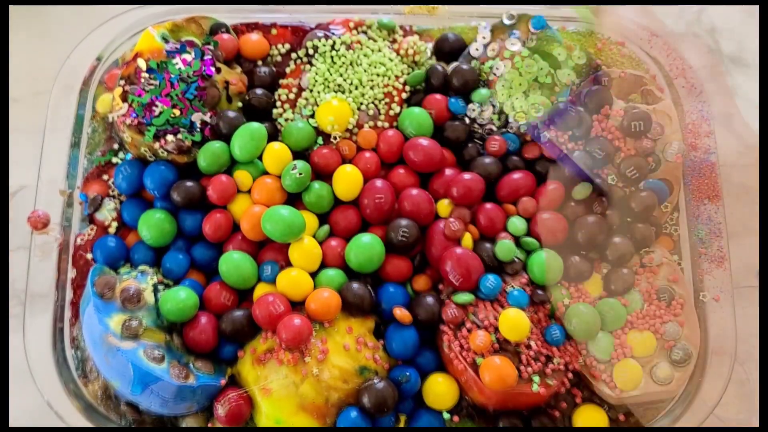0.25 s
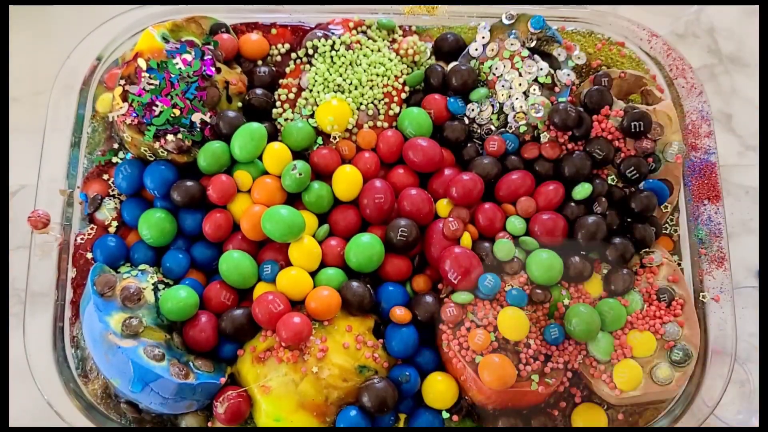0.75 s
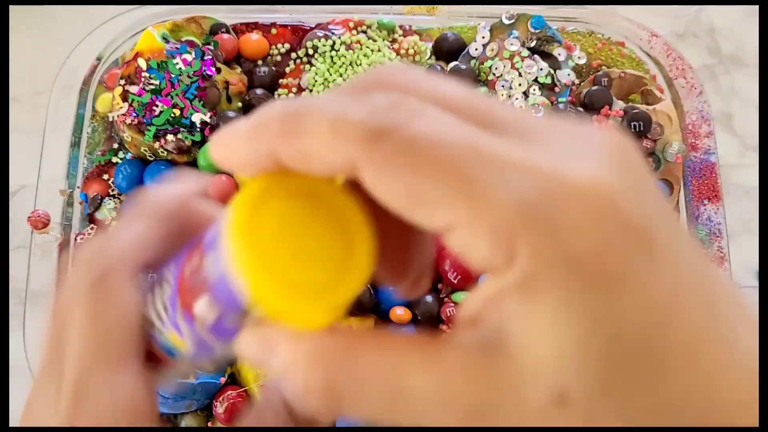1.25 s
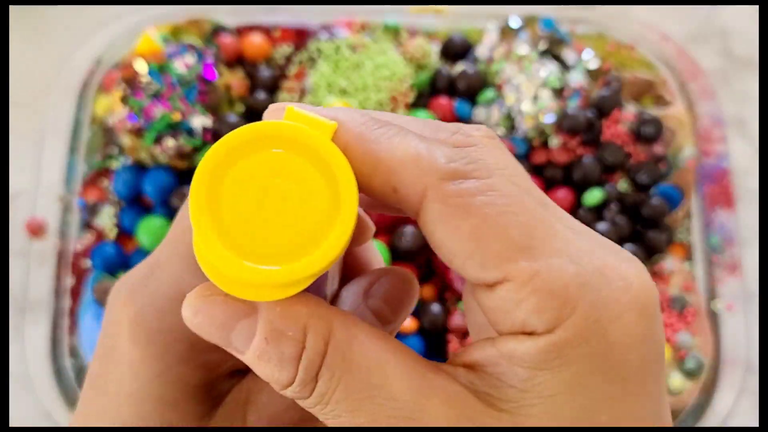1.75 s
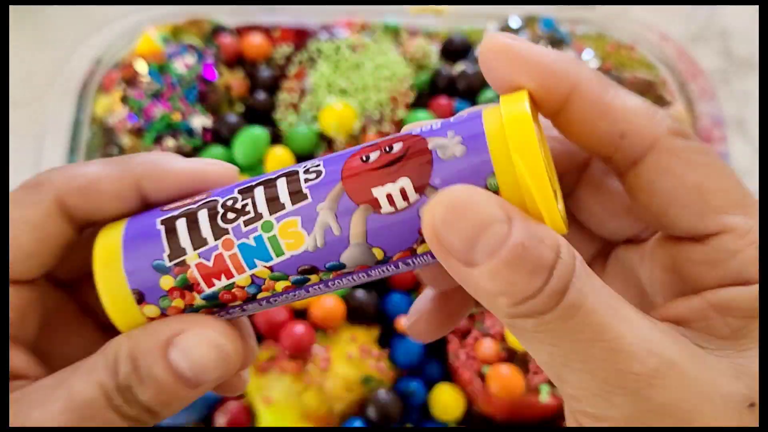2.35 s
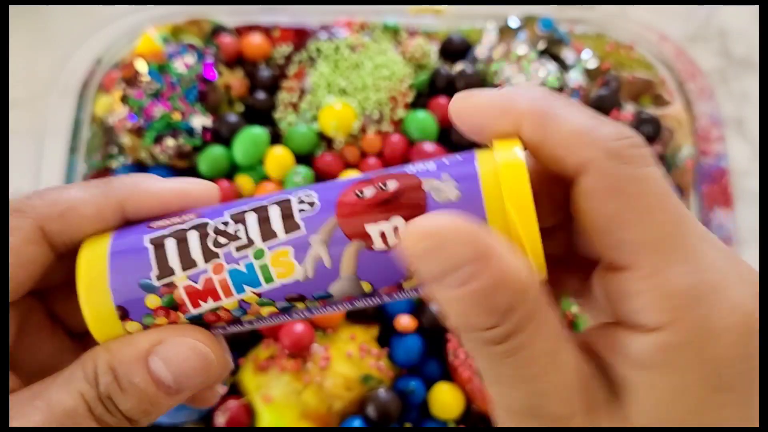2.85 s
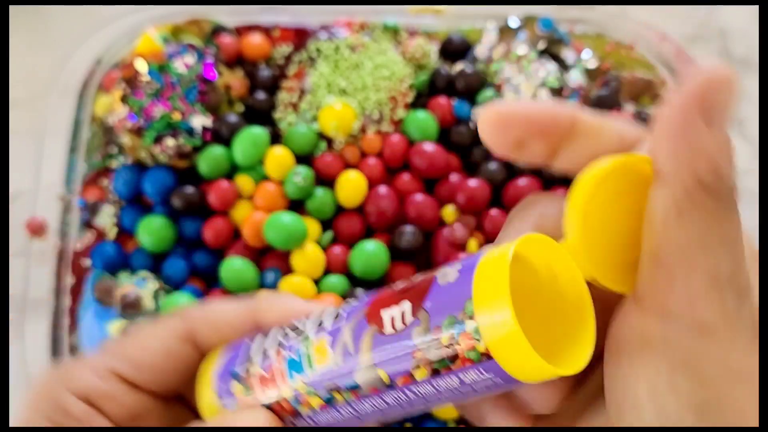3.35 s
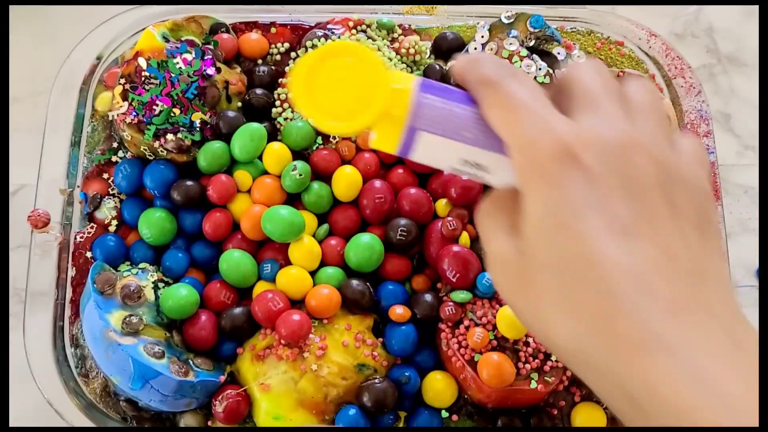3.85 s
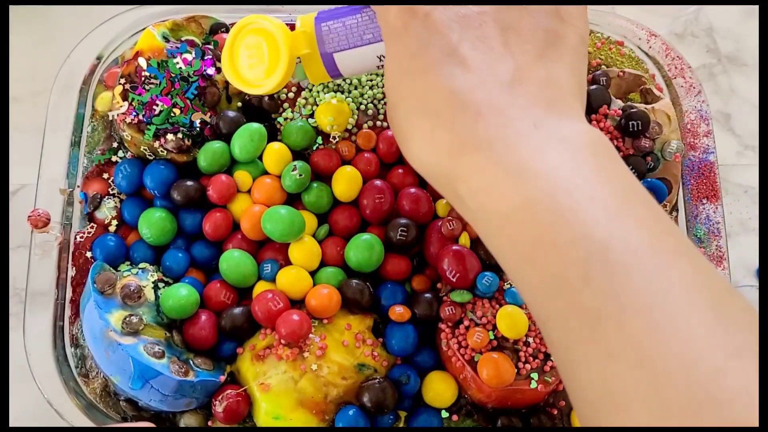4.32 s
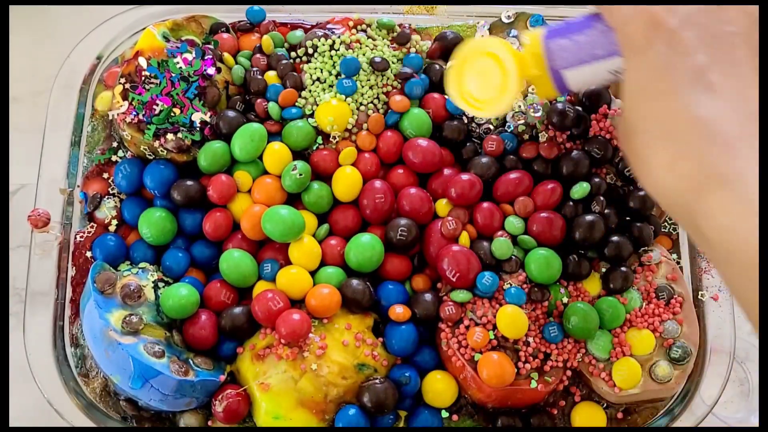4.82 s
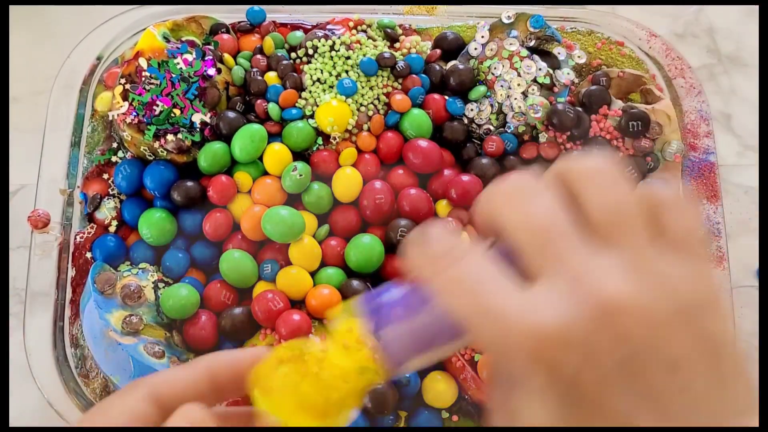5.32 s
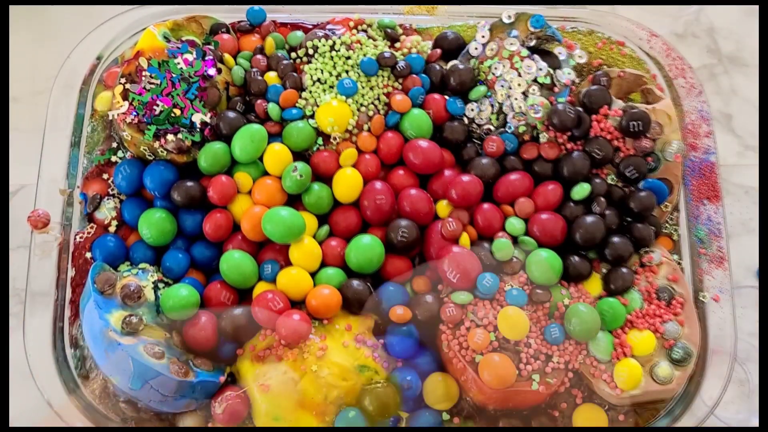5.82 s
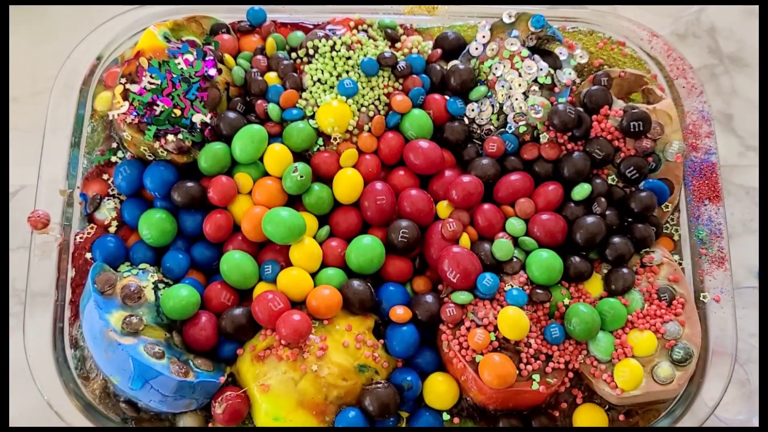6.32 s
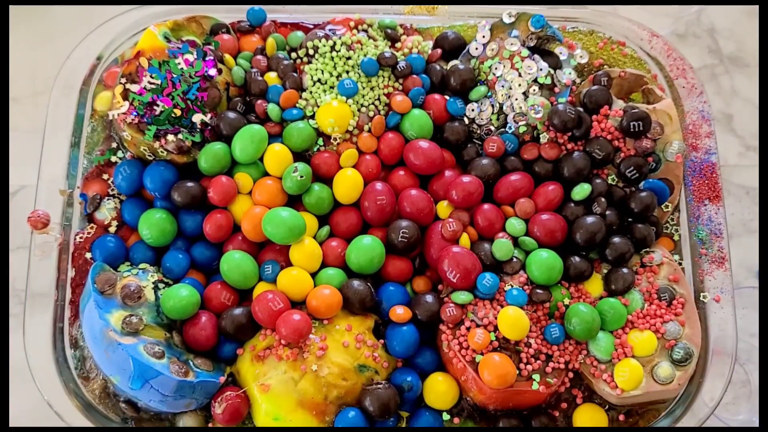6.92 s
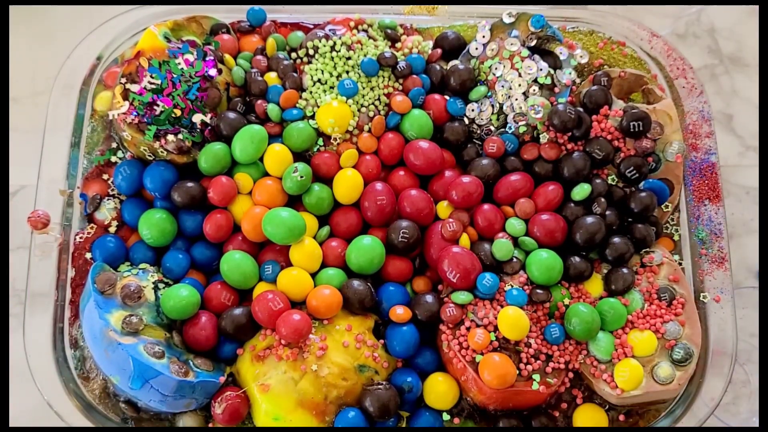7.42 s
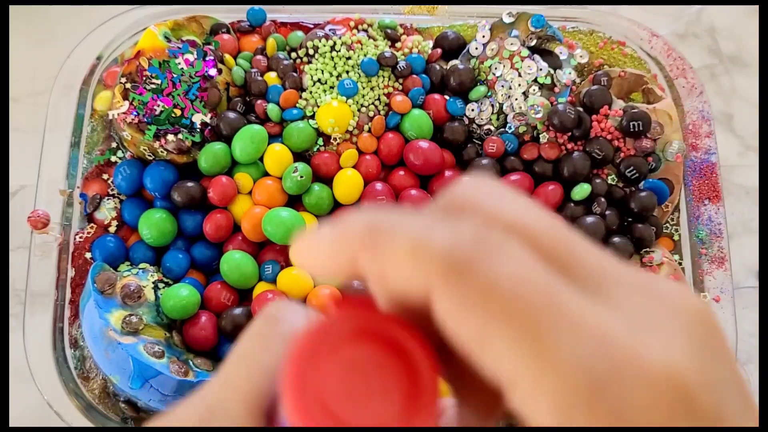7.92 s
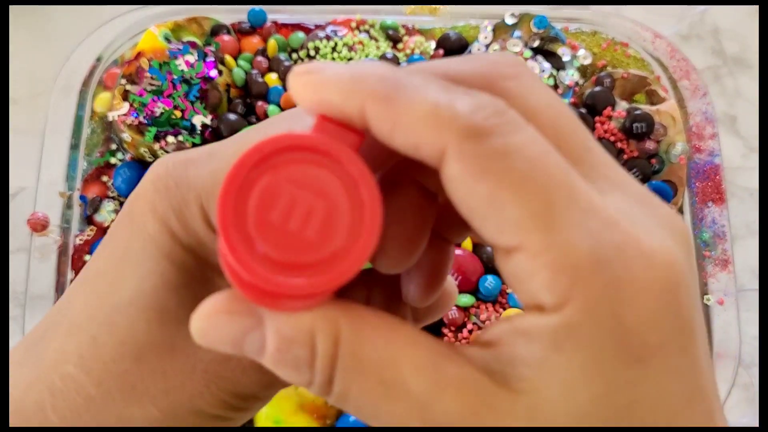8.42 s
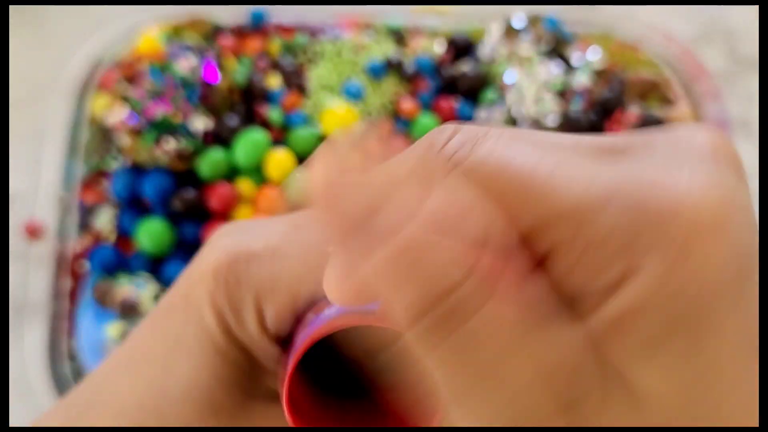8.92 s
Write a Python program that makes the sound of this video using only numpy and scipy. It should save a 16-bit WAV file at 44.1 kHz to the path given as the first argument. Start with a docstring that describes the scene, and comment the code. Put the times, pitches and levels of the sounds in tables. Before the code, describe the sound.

Things are bumped and set down nearby, then a candy tube clicks, rattles softly and pops open with a hollow ring. A sliding rattle swells into a dense, crisp shower of tiny hard candies, with a hollow airy hum sinking in pitch as the tube empties. A thump, a loud clack and woody knocks with faint glass chinks follow, then another lid pop, all close in a small reverberant room.

```python
"""Mini candies skid down a plastic tube and pour onto other candies in a glass dish, as many small collisions.
The air in the emptying tube hums, and its pitch sinks. Before the pour, the tube is picked up, its seal torn
and its lid popped: filtered clicks with ringing modes. Afterwards things are knocked and set down nearby,
then a second tube is shaken and popped open. It is heard close up in a small hard room, over a low hum."""
import sys
import numpy as np
from scipy import signal
from scipy.fft import rfft, irfft, next_fast_len
from scipy.io import wavfile
from scipy.ndimage import uniform_filter1d

SR = 44100
rng = np.random.default_rng(int(sys.argv[2]) if len(sys.argv) > 2 else 0)


def put_to_file(sound):
    """Save the sound as 16-bit audio at rate SR, in the file named by the first command-line argument."""
    columns = np.atleast_2d(sound).T  # one column per channel
    safe = np.clip(columns, -1, 1)
    whole_steps = np.round(safe * 32767)
    wavfile.write(sys.argv[1], SR, whole_steps.astype(np.int16))


N = 403956
TIME = np.arange(N) / SR  # seconds
TOP_HZ = 16000  # upper limit of the sound
LN_60_DB = np.log(1000)  # a fall of 60 dB


def undb(db):
    """Turn decibels into gain."""
    return 10 ** (np.asarray(db) / 20)


def unit(x):
    """Scale to rms 1."""
    return x / np.sqrt(np.mean(x ** 2) + 1e-20)


def at(points, hz):
    """Read a table of (Hz, value) points, with straight lines over log frequency."""
    f, value = np.transpose(points)
    return np.interp(np.log(hz + 1), np.log(f), value)


def body(points, tilt=0, size=2048):
    """Response of a struck thing: it has the given colour and unit energy, and starts at once."""
    hz = np.fft.rfftfreq(size, 1 / SR)
    db = at(points, hz) + tilt * np.log2(np.maximum(hz, 300))
    # folding the cepstrum forward in time gives the minimum-phase response
    cepstrum = irfft(np.log(undb(db)))
    cepstrum[1:size // 2] *= 2
    cepstrum[size // 2 + 1:] = 0
    h = irfft(np.exp(rfft(cepstrum)))
    return h / np.linalg.norm(h)


def through(x, h):
    """Pass a sound through a response."""
    return signal.oaconvolve(np.atleast_2d(x), np.atleast_2d(h), axes=1)[:, :np.shape(x)[-1]]


def add(out, s, x):
    """Mix a short sound in at s seconds."""
    i = max(int(s * SR), 0)
    out[:, i:i + x.shape[-1]] += x[..., :N - i]


def mode(hz, t60):
    """One ringing mode: a sine that decays from 1 by 60 dB in t60 seconds."""
    t = np.arange(SR // 2) / SR
    return np.sin(2 * np.pi * hz * t) * np.exp(-LN_60_DB * t / t60)


def swell(s, hold_s, db, rise_s, fade_s):
    """Gain that rises by 60 dB to its level at s seconds, holds, and fades by 60 dB; silent outside."""
    start, end = np.clip(np.array([s - rise_s, s + hold_s + fade_s]) * SR, 0, N).astype(int)
    t = np.arange(start, end) / SR
    before = np.maximum(s - t, 0) / rise_s
    after = np.maximum(t - s - hold_s, 0) / fade_s
    gain = np.zeros(N)
    gain[start:end] = undb(db) * np.exp(-LN_60_DB * (before + after))
    return gain


def gestures(rows, rise_s, fade_s):
    """Add up one swell for each row of start, length and level."""
    return sum(swell(s, length, db, rise_s, fade_s) for s, length, db in rows)


def stereo_noise(size, wide_hz):
    """Spectrum of noise that is alike on both sides in the bass and unrelated in the treble."""
    mid, side = rfft(rng.standard_normal((2, size)))
    hz = np.fft.rfftfreq(size, 1 / SR)
    width = hz / np.hypot(hz, wide_hz)
    return (mid + np.array([[1], [-1]]) * width * side) / np.sqrt(1 + width ** 2), hz


def contact(scatter_db, scatter_s, lead=0, size=2048):
    """A click, earlier on the left by lead samples, and its noisy scatter off hands and dish."""
    t = np.arange(size) / SR
    noise = irfft(stereo_noise(size, wide_hz=1800)[0])
    x = noise * np.exp(-t / scatter_s) * (1 - np.exp(-t / .0003))
    x *= undb(scatter_db) / np.linalg.norm(x, axis=1, keepdims=True)
    x[0, max(-lead, 0)] += 1
    x[1, max(lead, 0)] += 1
    return x / np.sqrt(1 + undb(scatter_db) ** 2)


def blows(rows, colour, scatter_db, scatter_s, lead=0, pan_db=0, modes=()):
    """Each contact sounds the body and rings its modes, which vary a little in pitch and strength."""
    out = np.zeros((2, N))
    sides_db = np.array([[pan_db], [-pan_db]]) / 2
    for s, db, tilt in rows:
        strength = np.sqrt(.005 * SR) * undb(db + sides_db)  # levels count the energy over 5 ms
        hit = through(contact(scatter_db, scatter_s, lead), body(colour, tilt))
        add(out, s, strength * hit / np.linalg.norm(hit, axis=1, keepdims=True))
        for hz, share_db, t60 in modes:
            ring = mode(hz * (1 + .025 * rng.standard_normal()), t60)
            struck_db = 3 * rng.standard_normal()
            add(out, s, strength * undb(share_db + struck_db) * ring / np.linalg.norm(ring))
    return out


def collision_kinds(colour, scatter_db, scatter_s, ring_hz, count, size):
    """A set of tiny clicks, each from its own place and with its own brief ring."""
    ring_db, ring_s, ring_octaves = -5, .004, .6  # level against the click, t60, spread of pitch
    shape, grains = body(colour), []
    for pitch, lead in zip(rng.standard_normal(count), rng.integers(-5, 10, count)):
        click = contact(scatter_db, scatter_s, lead, size=size)
        hz = min(ring_hz * 2 ** (ring_octaves * pitch), TOP_HZ)
        ring = through(click, mode(hz, ring_s)[:size])
        grains.append(through(unit(click) + undb(ring_db) * unit(ring), shape))
    return unit(np.array(grains))


def rattle(gain, colour, rate, spread_db, scatter_db, scatter_s, ring_hz, count=40, size=1024):
    """Many small collisions of uneven strength, rate of them a second, follow the gain."""
    grains = collision_kinds(colour, scatter_db, scatter_s, ring_hz, count, size)
    hits = int(rate * N / SR)
    starts = ((np.arange(hits) + 2 * rng.random(hits)) * SR / rate).astype(int) % N
    strengths_db = spread_db * np.minimum(rng.standard_normal(hits), 2)
    strengths = unit(rng.choice([-1, 1], hits) * undb(strengths_db))
    kinds = rng.integers(count, size=hits)
    out = np.zeros((2, N))
    for i, strength, kind in zip(starts, strengths, kinds):
        if gain[i] > 0:
            add(out, i / SR, gain[i] * strength * grains[kind])
    return out / np.sqrt(rate * size / SR)


def stream_flow():
    """Flow of candies into the dish: it builds, thins slowly and stops when the tube is empty."""
    start_s, sag_db_per_s = 4.535, 3.5
    since = np.maximum(TIME - start_s, 0)
    return swell(start_s, .37, db=-35.5, rise_s=.74, fade_s=.13) * undb(-sag_db_per_s * since)


# Colour of candy landing on candy. Each row: frequency in Hz, level in dB.
CANDY_COLOUR = [(150, -56), (370, -3), (600, -13), (1200, -6), (3500, -1.5), (5500, -2.5), (11000, 5),
                (16000, 1)]


def stream(flow):
    """The candies land on others as a dense patter of tiny bright collisions."""
    return rattle(flow, CANDY_COLOUR, rate=950, spread_db=5.5, scatter_db=2, scatter_s=.0009, ring_hz=7000)


# Single candies landing hard.
# Each row: start in seconds, level in dB, brightness in dB per octave above 300 Hz.
DROPS = [(4.33, -44, -1), (4.397, -31, 2.5), (4.4315, -29, 1.5), (4.4435, -29, -1), (4.565, -27.5, 3),
         (4.584, -31, 2), (4.599, -28, 1), (4.636, -30, -1), (4.658, -29, 1.5), (4.665, -33, 0.5),
         (4.685, -31, 3), (4.769, -35, 2), (4.905, -25.5, 1.5), (4.944, -33, 3), (4.958, -30, 2),
         (5.016, -37.5, 7)]


def drops():
    """Single candies stand out of the stream as sharp clicks."""
    return blows(DROPS, CANDY_COLOUR, scatter_db=6, scatter_s=.0009, lead=2)


def skid_gain():
    """How strongly the candies skid: a slow rise before they land, then a fade."""
    return swell(4.376, .25, db=-41, rise_s=1.48, fade_s=.7)


# Colour of candies skidding down the tube. Each row: frequency in Hz, level in dB.
SKID_COLOUR = [(600, -23), (1300, 1), (2000, 1.5), (3550, -5), (4000, 7.5), (4450, -4.5), (12000, -12.5)]


def skid(gain):
    """Candies sliding down the tilted tube knock on its wall many times a second."""
    return rattle(gain, SKID_COLOUR, rate=650, spread_db=6, scatter_db=2, scatter_s=.002, ring_hz=3500)


JOLT_RISE_S, JOLT_SETTLE_S = .05, .05  # over 60 dB
# Jolts that make the candies shift inside a tube. Each row: start in seconds, length in seconds, level in dB.
JOLTS = [(1.2, 0.27, -52), (1.38, 0.025, -41), (2.45, 0.037, -52), (2.908, .016, -52.5),
         (3.42, 0.058, -57.5), (3.495, 0.052, -50), (3.61, 0.0059, -51.5), (3.652, 0.053, -50),
         (3.742, 0.032, -48.5), (3.878, 0.024, -40), (3.94, 0.086, -49), (7.805, 0.15, -52),
         (7.94, 0.076, -44.5)]


def jolt_gain():
    """How strongly the candies are shaken: one short swell for each jolt."""
    return gestures(JOLTS, JOLT_RISE_S, JOLT_SETTLE_S)


# Colour of sounds inside the tube. Each row: frequency in Hz, level in dB.
IN_TUBE = [(500, -14), (2000, -13.5), (2800, -0.5), (4200, -6), (6000, -4), (10000, -7), (16000, -11.5)]


def tube_rattle(gain):
    """Shaken candies strike each other and the tube around them."""
    return rattle(gain, IN_TUBE, rate=900, spread_db=5, scatter_db=3, scatter_s=.0012, ring_hz=5000)


def column_pitch(put_down_s):
    """A longer air column sounds lower: it sinks as the tube empties, and again as its mouth is shaded."""
    full_hz, empty_hz, half_empty_s, emptying_s = 978, 799, 4.315, .0424
    put_down_hz, sag_hz_per_s = 785, 870
    emptied = 1 / (1 + np.exp((half_empty_s - TIME) / emptying_s))
    pouring = full_hz + (empty_hz - full_hz) * emptied
    set_down = put_down_hz - sag_hz_per_s * (TIME - put_down_s)
    return np.where(TIME < put_down_s - JOLT_RISE_S, pouring, set_down)


def air_column(jolts, skids, flow, width_hz):
    """Moving candies stir the air in the open tube, which resonates; it sounds once more when put down."""
    open_s, put_down_s, turns_away_s = 3.2, 5.525, 3.82
    # jolts ring the column less audibly once the mouth points away
    stirred_by_jolts = jolts * undb(-8.5 - 11.5 * (TIME > turns_away_s))
    stirred_by_pour = np.hypot(skids * undb(-10.5), flow * undb(-21))
    drive = (stirred_by_jolts + stirred_by_pour) * (TIME > open_s) * (TIME < put_down_s)
    # the power lingers as the column rings on, with a time constant of 6.9 ms
    keep = np.exp(-1 / (.0069 * SR))
    stirred = np.sqrt(signal.lfilter([1 - keep], [1, -keep], drive ** 2))
    gain = stirred + swell(put_down_s, 0, db=-47, rise_s=JOLT_RISE_S, fade_s=.34)
    # narrow noise, evened out in level, moved up to the column's pitch
    noise = rng.standard_normal(N) + 1j * rng.standard_normal(N)
    stir = signal.lfilter([1], [1, -np.exp(-np.pi * width_hz / SR)], noise)
    stir = stir / np.sqrt(uniform_filter1d(abs(stir) ** 2, size=SR // 14))
    tone = np.real(stir * np.exp(2j * np.pi * np.cumsum(column_pitch(put_down_s)) / SR))
    return unit(tone) * gain * undb(np.array([[1.5], [-1.5]]))  # louder on the left


# Lid pops. Each row: start in seconds, level in dB, brightness in dB per octave above 300 Hz.
POPS = [(3.1655, -16, 0), (3.1753, -24.5, 4), (9.0143, -13.5, -2.5), (9.0195, -16.5, 3.5)]
# Colour of the pops. Each row: frequency in Hz, level in dB.
POP_BODY = [(35, -36), (130, 6.5), (280, 3), (550, 4.5), (780, 0.5), (1300, -12), (2200, -10), (3300, -6.5),
            (6000, -16.5), (16000, -29)]


def pops():
    """A lid bursts free: a click through the boomy colour of the tube."""
    return blows(POPS, POP_BODY, scatter_db=-2, scatter_s=.0034, lead=4)


# A popped tube rings on.
# Each row: start in seconds, frequency in Hz, starting level in dB, time in seconds to fall 60 dB.
RINGS = [(3.1711, 149, -20, 0.022), (3.167, 3280, -11, 0.012), (3.175, 1226, -7.5, 0.0089),
         (9.0172, 268, -22, 0.087), (9.023, 937.5, -12, 0.097), (9.015, 1280, -9.5, 0.019)]


def rings():
    """Single modes of the popped tube ring on and die away."""
    out = np.zeros((2, N))
    for s, hz, db, t60 in RINGS:
        add(out, s, undb(db) * mode(hz, t60))
    return out


# The lid's rim scrapes off the tube.
# Each row: start in seconds, length in seconds, level in dB, squeak frequency in Hz.
SQUEAKS = [(3.177, 0.014, -27.5, 4880), (3.191, 0.0047, -22.5, 4860), (9.02, 0.05, -27.5, 4736),
           (9.024, 0.021, -27.5, 3560), (9.036, 0.019, -27, 5940)]


def squeaks(width_hz, grit_db, catch_db):
    """The rim sticks and slips: short gritty squeals that catch and let go, out of step between the sides."""
    out = np.zeros((2, N))
    for s, length, db, hz in SQUEAKS:
        slips = rng.standard_normal((4, SR // 10))[:, :int(length * SR)]
        wander = np.sqrt(2 * np.pi * width_hz / SR) * slips[2]
        phase = np.cumsum(2 * np.pi * hz / SR + wander)
        squeal = unit(np.array([np.sin(phase), np.cos(phase)]))
        grit = through(slips[:2], body(IN_TUBE, tilt=1.5))
        catch = unit(undb(catch_db * unit(uniform_filter1d(slips[3], size=80))))
        fades = signal.windows.tukey(slips.shape[1])
        add(out, s, undb(db) * (squeal + undb(grit_db) * grit) * catch * fades)
    return out


# Snaps of seal and tube. Each row: start in seconds, level in dB, brightness in dB per octave above 300 Hz.
SNAPS = [(1.171, -44.5, 0.5), (1.218, -32, -1), (1.259, -35.5, -0.5), (1.377, -30.5, 4.5),
         (2.4025, -43.5, -3.5), (2.431, -39.5, -1.5), (2.443, -39, -7), (2.453, -37.5, 0.5),
         (2.466, -43, -2.5), (2.476, -40.5, -1), (2.506, -43.5, 3), (2.561, -34.5, -0.5), (2.669, -39, -1),
         (2.683, -38.5, -0.5), (2.906, -46.5, -1), (3.065, -32, 4), (3.493, -43.5, 10), (3.657, -46, 7),
         (3.675, -39, 9), (3.879, -40, 9), (3.89, -40, 11), (3.941, -37.5, 6.5), (4.113, -43.5, 4),
         (7.823, -41.5, 2), (7.883, -43, 0), (7.898, -34, 3), (7.964, -35.5, 5), (7.999, -41, 1),
         (8.888, -36, 1.5)]
# Colour of the tube's wall. Each row: frequency in Hz, level in dB.
TUBE_WALL = [(200, -38), (750, -31), (1400, -9), (2700, -4), (3280, 5.5), (3800, -7.5), (6000, -9.5),
             (9000, -14), (16000, -27.5)]
# Modes of the wall. Each row: frequency in Hz, share of the energy in dB, time in seconds to fall 60 dB.
WALL_MODES = [(2650, -18, .012), (3290, -15, .018)]


def snaps():
    """Small snaps of seal and plastic make the thin wall ring for a moment."""
    return blows(SNAPS, TUBE_WALL, scatter_db=8, scatter_s=.0022, lead=3, modes=WALL_MODES)


# Hands rubbing on plastic. Each row: start in seconds, length in seconds, level in dB.
RUBS = [(5.19, 0.3, -62), (5.49, 0.044, -51.5)]
# Colour of the rubbing. Each row: frequency in Hz, level in dB.
RUB_COLOUR = [(400, 2), (1000, -4.5), (1550, -2), (2400, -9.5), (15000, -21.5)]


def rubs():
    """Rubbing is a very dense run of tiny catches of skin on plastic."""
    gain = gestures(RUBS, rise_s=.1, fade_s=.22)
    return rattle(gain, RUB_COLOUR, rate=2900, spread_db=7, scatter_db=6.5, scatter_s=.0035, ring_hz=3000)


# Light taps. Each row: start in seconds, level in dB, brightness in dB per octave above 300 Hz.
TAPS = [(.1, -22, 6), (.157, -24, 4.5), (.25, -29.5, 1.5), (.317, -35, -1), (.372, -28, 0.5),
        (.441, -32, 3.5), (.621, -43, -2.5)]
# Colour of the tapped thing. Each row: frequency in Hz, level in dB.
TAP_BODY = [(150, -17.5), (500, -0.5), (2400, -4.5), (5000, -3.5), (6500, -7), (16000, -24.5)]
# Its modes. Each row: frequency in Hz, share of the energy in dB, time in seconds to fall 60 dB.
TAP_MODES = [(445, -12, 0.055)]


def taps():
    """Light taps: bright clicks and a short ring, slightly earlier on the right."""
    return blows(TAPS, TAP_BODY, scatter_db=7, scatter_s=.0039, lead=-9, modes=TAP_MODES)


# Dull knocks. Each row: start in seconds, level in dB, brightness in dB per octave above 300 Hz.
KNOCKS = [(6.809, -27, 1.5), (6.967, -29.5, 0), (7.045, -29, 1.5), (7.079, -31.5, 1), (7.093, -35.5, 2),
          (7.25, -37.5, -4), (7.349, -38, -3), (7.462, -46.5, -7.5), (7.661, -48, -6.5), (7.762, -39.5, -4)]
# Colour of the knocked thing. Each row: frequency in Hz, level in dB.
KNOCK_BODY = [(80, -27.5), (360, 2), (700, -0.5), (1050, -1), (1650, 2.5), (2100, -11), (2700, -25.5),
              (8000, -34.5), (14000, -50)]
# Modes that knocks and bumps ring.
# Each row: frequency in Hz, share of the energy in dB, time in seconds to fall 60 dB.
KNOCK_MODES = [(369, -13, 0.15), (1049, -10, .13), (1630, -12.5, .14)]


def knocks():
    """Dull knocks: each blow rings a few modes of the thing it hits."""
    return blows(KNOCKS, KNOCK_BODY, scatter_db=7, scatter_s=.0052, lead=3, pan_db=1, modes=KNOCK_MODES)


# Heavier bumps. Each row: start in seconds, level in dB, brightness in dB per octave above 300 Hz.
BUMPS = [(.004, -20.5, 1), (.202, -21.5, 0)]
# Colour of the bumps. Each row: frequency in Hz, level in dB.
BUMP_BODY = [(80, -17), (170, -1), (270, -7), (700, -0.5), (1500, -3), (2800, -10.5), (7000, -24),
             (16000, -33.5)]


def bumps():
    """Heavier bumps ring the same modes as the knocks, with longer scatter."""
    return blows(BUMPS, BUMP_BODY, scatter_db=4.5, scatter_s=.014, modes=KNOCK_MODES)


# A hard clack. Each row: start in seconds, level in dB, brightness in dB per octave above 300 Hz.
CLACKS = [(5.908, -11, 0.027), (5.9103, -24.5, 0.77)]
# Colour of the clack. Each row: frequency in Hz, level in dB.
CLACK_BODY = [(80, -19), (250, -9), (700, -6), (1100, -13.5), (1550, -7), (2000, -14), (2800, -3.5),
              (7000, -20.5), (11000, -15), (16000, -18)]


def clacks():
    """Two hard contacts almost at once, with very little scatter, make one sharp clack."""
    return blows(CLACKS, CLACK_BODY, scatter_db=-4.5, scatter_s=.0008, lead=17)


# The clacked thing chatters as it settles.
# Each row: start in seconds, level in dB, brightness in dB per octave above 300 Hz.
CHATTER = [(5.918, -19.5, 5)]


def chatter():
    """The settling thing makes a contact that is mostly scatter."""
    return blows(CHATTER, BUMP_BODY, scatter_db=11.5, scatter_s=.022)


# Soft put-downs. Each row: start in seconds, level in dB, brightness in dB per octave above 300 Hz.
THUMPS = [(.935, -21, 0.06), (5.4845, -26, -2), (6.395, -42.5, 2.5)]
# Colour of the put-downs. Each row: frequency in Hz, level in dB.
THUMP_BODY = [(70, -14.5), (190, -12.5), (380, 3), (560, -10.5), (740, -10), (1000, -20), (1700, -25.5),
              (3500, -21.5), (9000, -24), (16000, -34)]
# Their low ring. Each row: frequency in Hz, share of the energy in dB, time in seconds to fall 60 dB.
THUMP_MODES = [(385, -11, .1), (720, -15, .1)]


def thumps():
    """Soft put-downs: a dull contact and a low ring, a little to the left."""
    return blows(THUMPS, THUMP_BODY, scatter_db=-5.5, scatter_s=.008, lead=10, pan_db=2.5, modes=THUMP_MODES)


# Glass chinks along with some knocks. Each row: start in seconds, level in dB.
CHINKS = [(6.967, -56), (7.048, -59), (7.078, -54)]
# Modes of the glass. Each row: frequency in Hz, added level in dB, time in seconds to fall 60 dB.
GLASS_MODES = [(4350, -7, 0.2), (6000, 2, 0.17), (7050, 0, 0.12), (7780, -4, 0.11)]


def chinks():
    """Each light touch rings all the modes of the glass."""
    out = np.zeros((2, N))
    ring = sum(undb(db) * mode(hz, t60) for hz, db, t60 in GLASS_MODES)
    for s, db in CHINKS:
        add(out, s, undb(db) * ring)
    return out


# How long the room rings. Each row: frequency in Hz, time in seconds to fall 60 dB.
ROOM_T60 = [(100, 0.53), (1500, 0.68), (3000, 0.52), (6000, 0.47), (14000, 0.3)]


def room(x, build_s, wide_hz):
    """A diffuse tail that builds up as the walls answer and loses its treble first."""
    noise, hz = stereo_noise(SR, wide_hz)
    t, tail = np.arange(SR) / SR, 0
    for share, (_, t60) in zip(np.eye(len(ROOM_T60)), ROOM_T60):
        band = np.interp(hz, np.array(ROOM_T60)[:, 0], share)
        tail = tail + irfft(noise * band) * np.exp(-LN_60_DB * t / t60)
    tail *= 1 - np.exp(-(t / build_s) ** 2)
    return through(x, tail / np.linalg.norm(tail, axis=1, keepdims=True))


# Colour of the room air. Each row: frequency in Hz, level in dB.
AIR = [(25, -23.5), (70, 4.5), (105, -11.5), (400, -17), (1000, -24.5), (3000, -30.5), (8000, -42.5),
       (16000, -37.5)]
# The hum grows louder for a while. Each row: start in seconds, length in seconds, level in dB.
HUM_SWELLS = [(5.18, 1.26, -59.5), (7.9, 0.078, -49)]


def background(waver):
    """A machine hum, a sine wavering in phase and level, over faint room air made of coloured noise."""
    air_db, hum_hz, hum_db = -59.5, 74.4, -58.5
    noise, hz = stereo_noise(next_fast_len(N, True), 610)
    air = unit(irfft(noise * undb(at(AIR, hz)))[:, :N])
    drift = np.interp(TIME, np.arange(100) / 10, rng.standard_normal(100))
    # the reversed drift moves the level, so that level and phase waver apart
    hum = unit((1 + waver * drift[::-1]) * np.sin(2 * np.pi * hum_hz * TIME + waver * drift))
    hum_gain = undb(hum_db) + gestures(HUM_SWELLS, rise_s=.088, fade_s=.088)
    return undb(air_db) * air + hum * hum_gain


def scene():
    """Mix every source, and send each to the room at its own level in dB."""
    flow, skids, jolts = stream_flow(), skid_gain(), jolt_gain()
    sources = [
        (stream(flow), -7),
        (drops(), -9),
        (skid(skids), -10),
        (tube_rattle(jolts), -7),
        (air_column(jolts, skids, flow, width_hz=14), -14),
        (pops(), -9.5),
        (rings(), -15),
        (squeaks(width_hz=400, grit_db=-2, catch_db=4), -14),
        (snaps(), -11),
        (rubs(), -6),
        (taps(), -4),
        (knocks(), -3),
        (bumps(), -3),
        (clacks(), -6),
        (chatter(), -2),
        (thumps(), -11),
        (chinks(), -4)]
    direct = sum(x for x, _ in sources)
    sent = sum(x * undb(wet_db) for x, wet_db in sources)
    return direct + room(sent, build_s=.0052, wide_hz=900) + background(waver=.67)


def record(dry):
    """Clip at full scale, then cut the treble above TOP_HZ with a steep filter."""
    clipped = np.clip(dry, -1, 1)
    return signal.sosfilt(signal.ellip(8, .2, 70, TOP_HZ, fs=SR, output="sos"), clipped)


dry = scene()
out = record(dry)
put_to_file(out)
```